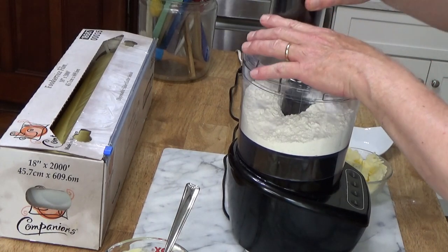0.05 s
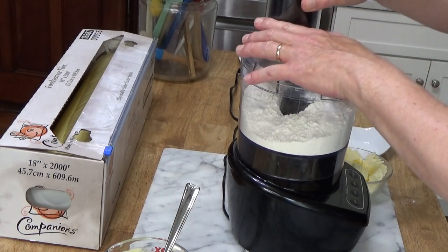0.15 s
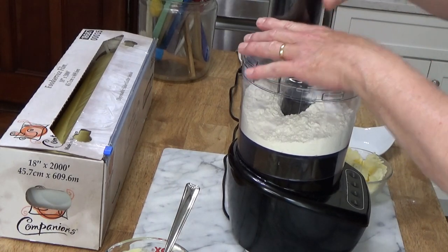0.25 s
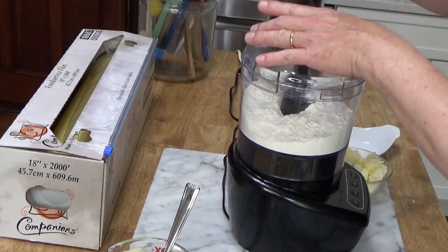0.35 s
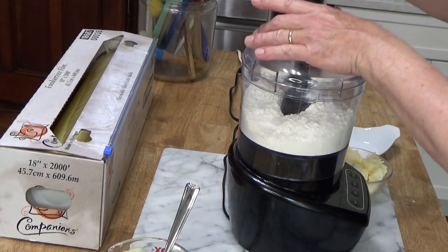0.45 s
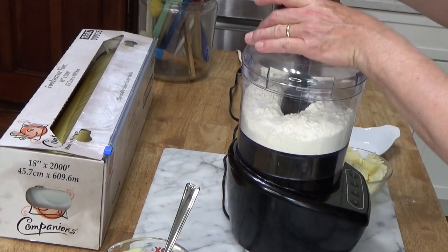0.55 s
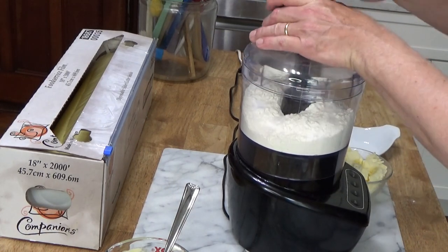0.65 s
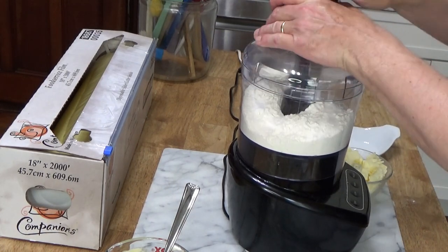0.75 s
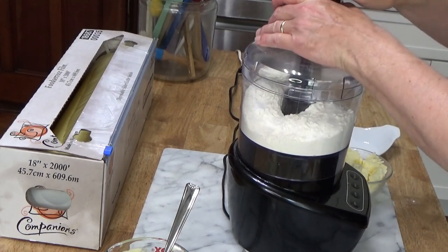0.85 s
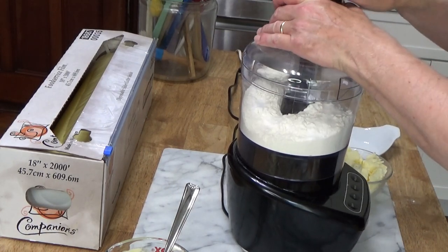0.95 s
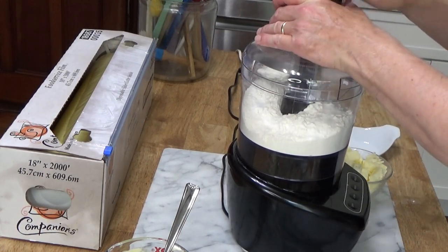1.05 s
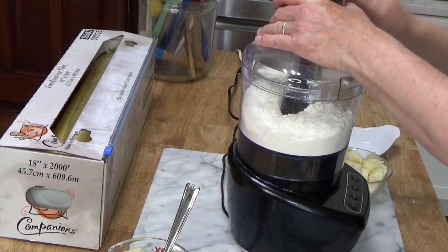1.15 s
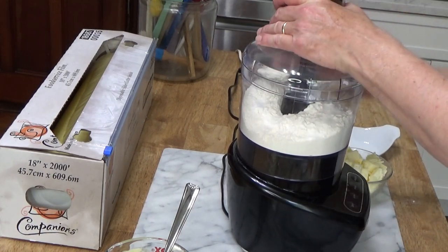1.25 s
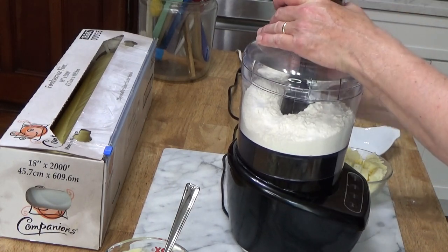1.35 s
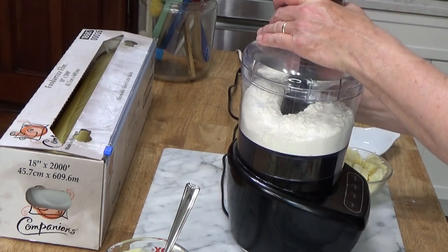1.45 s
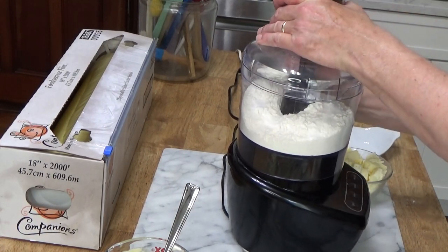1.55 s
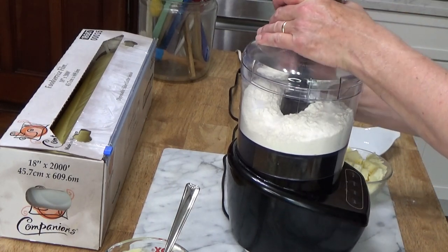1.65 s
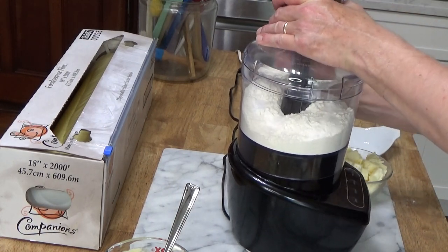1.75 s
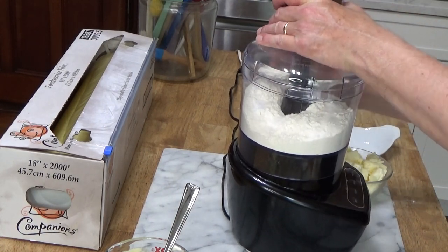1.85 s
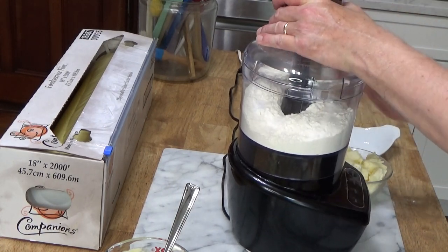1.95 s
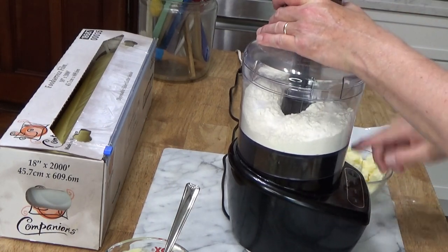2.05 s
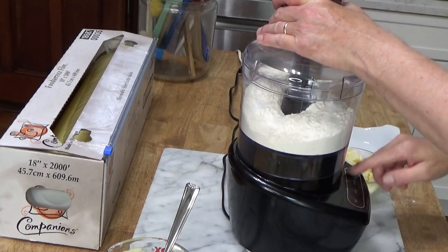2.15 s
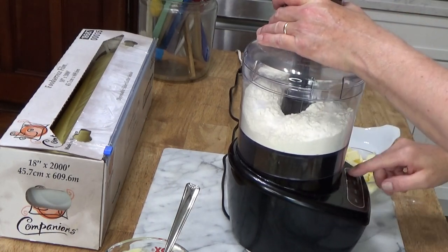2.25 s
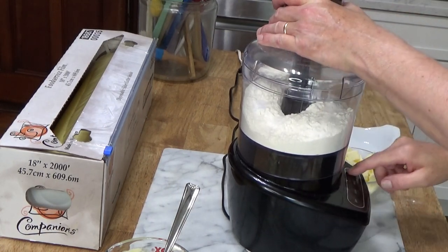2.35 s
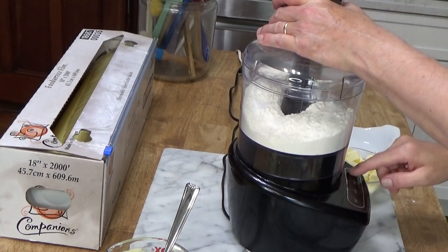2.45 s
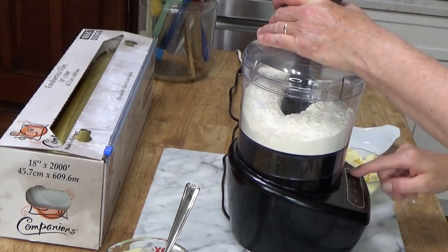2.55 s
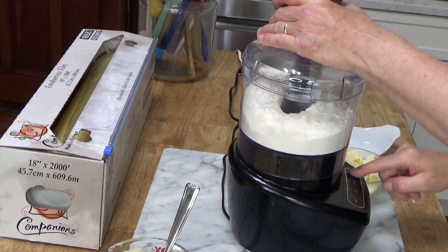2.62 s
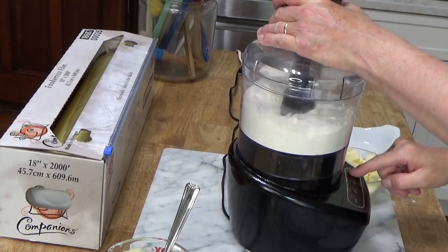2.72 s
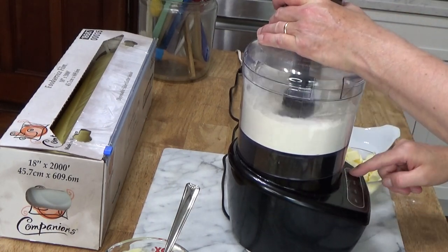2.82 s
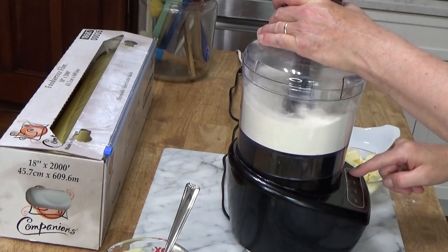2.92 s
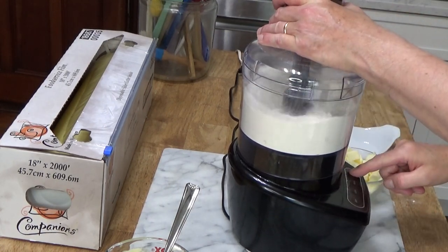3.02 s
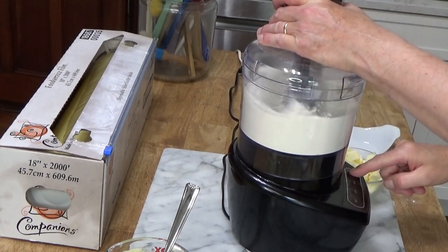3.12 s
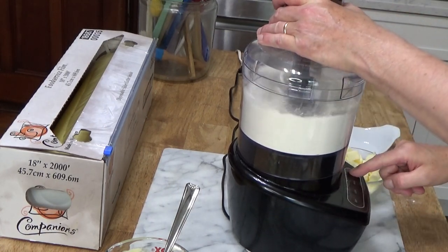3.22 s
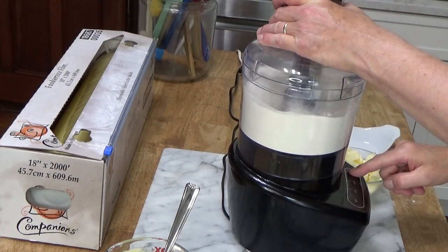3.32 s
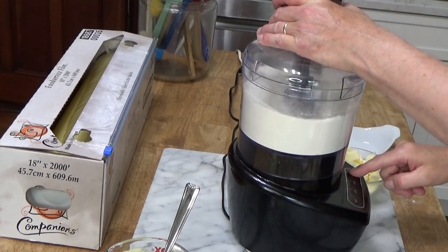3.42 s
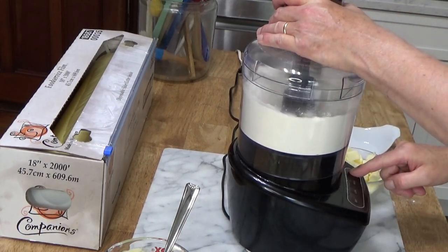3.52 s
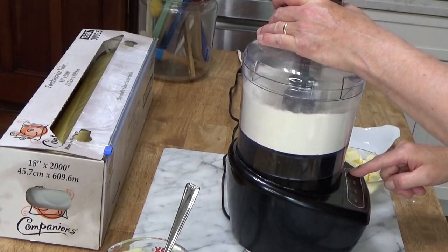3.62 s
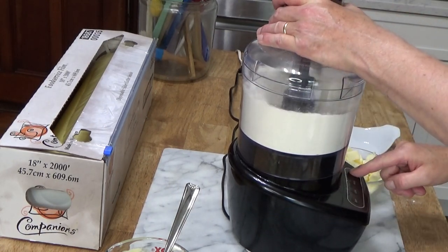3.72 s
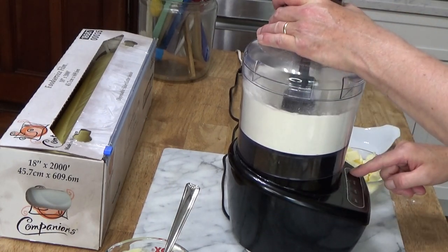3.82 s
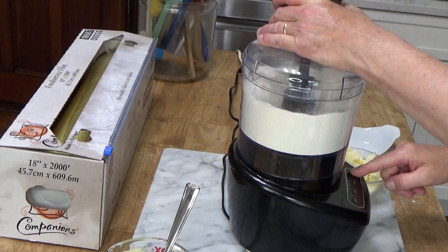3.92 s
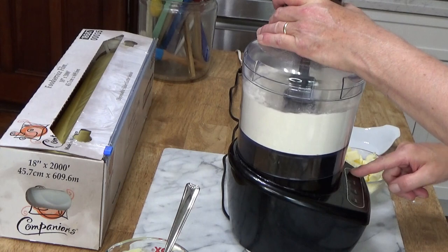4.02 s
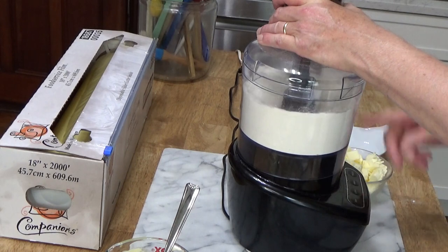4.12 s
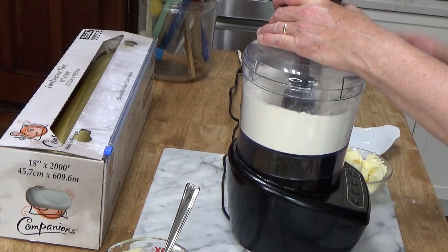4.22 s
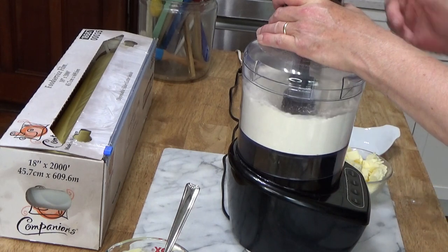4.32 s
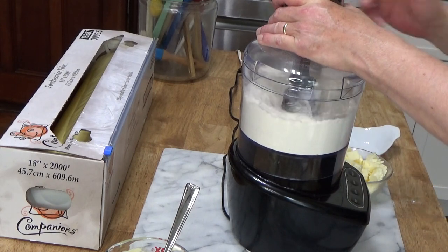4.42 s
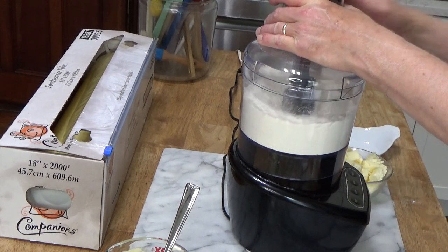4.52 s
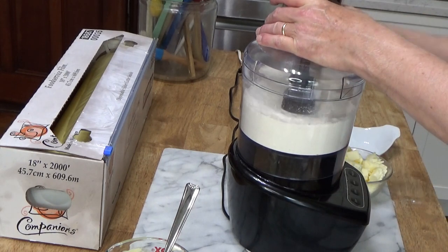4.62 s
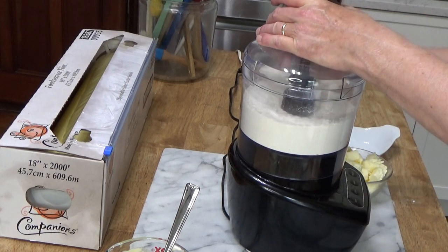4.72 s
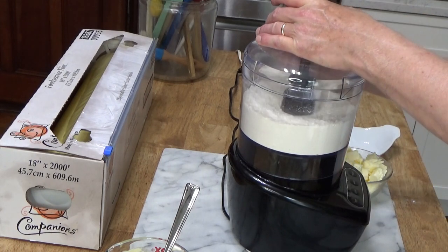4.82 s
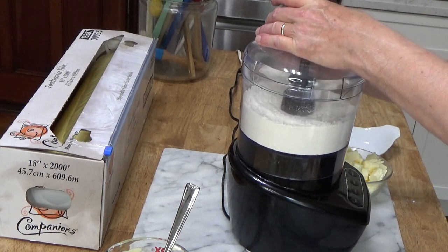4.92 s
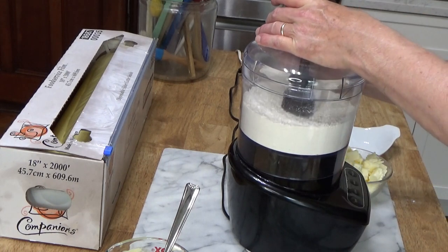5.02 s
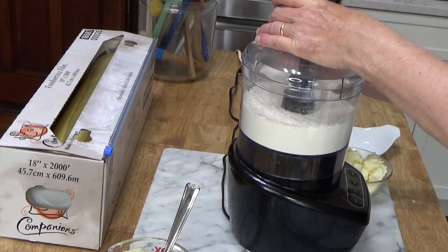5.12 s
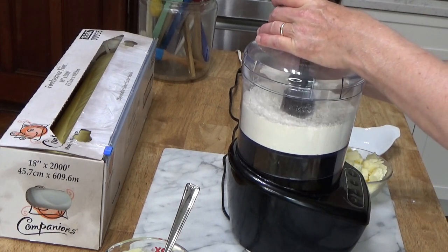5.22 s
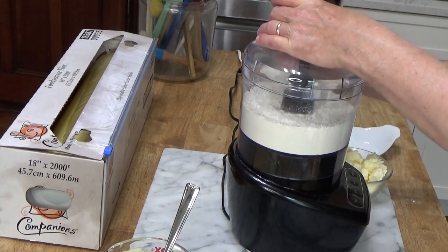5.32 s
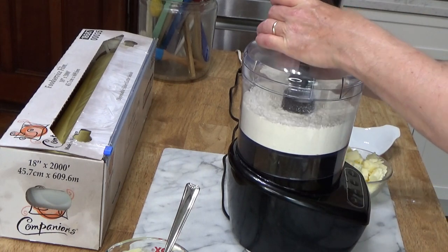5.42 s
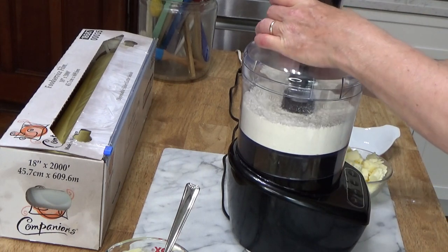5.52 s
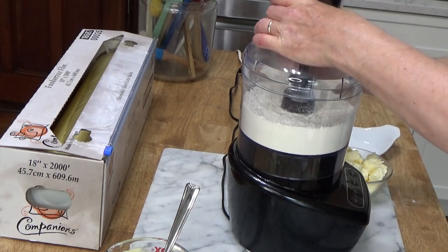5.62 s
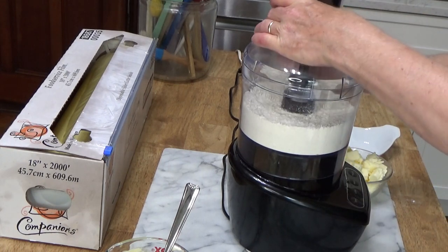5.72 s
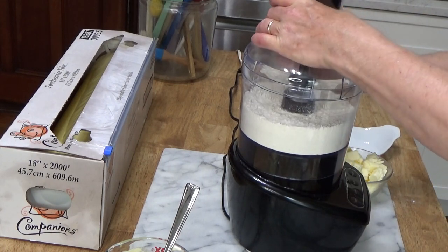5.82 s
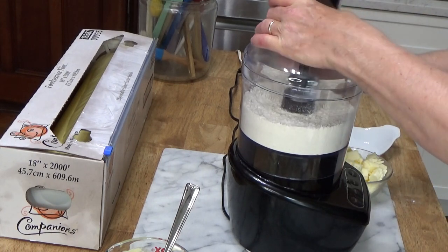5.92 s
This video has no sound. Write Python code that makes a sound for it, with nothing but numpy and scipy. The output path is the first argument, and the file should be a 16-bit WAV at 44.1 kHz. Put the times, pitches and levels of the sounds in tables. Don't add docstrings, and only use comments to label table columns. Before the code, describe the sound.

Plastic lid and feed-tube pusher clack and scrape in an echoing kitchen before a small geared motor runs briefly and coasts to a halt.

```python
import sys
import numpy as np
from scipy import signal
from scipy.fft import rfft, irfft, next_fast_len
from scipy.io import wavfile
from scipy.ndimage import uniform_filter1d

SR = 44100
rng = np.random.default_rng(int(sys.argv[2]) if len(sys.argv) > 2 else 0)


def gain_from_decibels(decibels):
    exponent = np.asarray(decibels, float) / 20
    return 10 ** exponent


def transcribe(u):
    v = np.clip(np.atleast_2d(u).T, -1, 1)
    q = np.round(v * 32767).astype(np.int16)
    wavfile.write(sys.argv[1], SR, q)


N = 263076

# pitch_hz, level_db (per Hz)
HUSH_COLOUR = [(47, -41), (80, -13), (288, -3.5), (714, -3), (931, 2.5), (1330, -5), (1450, -7),
               (1690, -4.5), (8120, -9.5), (15800, -16.5)]
HUSH_DB = -55.5 - 4.0
# pitch_hz, time_to_fall_60_db_s
KITCHEN_DECAY = [(120, .6), (300, .7), (700, .63), (1400, .61), (3700, .55), (9700, .43), (16000, .2)]
# pitch_hz, likeness (0 to 1)
ECHO_LIKENESS = [(100, 1), (300, 0.96), (700, 0.9), (1400, 0.34), (3000, 0.78), (12000, 0.62)]
# pitch_hz, level_db
FAR_KNOCK_COLOUR = [(120, -10), (280, 6), (900, 0), (3000, -4), (12000, -11)]
# pitch_hz, left_minus_right_db
LEFT_OVER_RIGHT = [(60, 1), (180, -3), (550, -2), (1650, -2), (4970, -2), (15000, -1)]

# pitch_hz, level_db (per Hz)
ROAR_COLOUR = [(40, -30), (151, -29), (219, -14), (344, -12), (464, -17), (728, -6), (1790, -5), (2190, -1),
               (2950, 2), (3610, 0.5), (4090, -7.5), (5120, -7.5), (9330, -16), (12000, -25), (15800, -37)]
# pitch_hz, width_hz, lift_db
HOUSING = [(745, 59, 7.5), (955, 50, 6.5), (1251, 12, 5), (1610, 157, 7.5), (2200, 290, 8.5),
           (6160, 150, 3.5), (8500, 98, -1), (10200, 530, 3.5)]
# pitch_hz, width_hz, lift_db
GEARBOX = (3600, 260, 7.5)
# pitch_hz, width_hz, lift_at_rest_db
SLOTS = [(6040, 83, -10.5), (8550, 100, 3), (9400, 470, 2)]
# pitch_hz, width_hz, lift_db, speed (turns per s), spread (turns per s)
DRUMMING = (2232, 380, -3.5, 244, 60)
# top_level_db, knee (turns per s), steepness (power), time_to_engage_s
ROAR_PARTS = [
    (-51, 300, 1.2, .05),
    (-21.5, 155, 1.19, 0.022),
    (-17, 187, 1.49, 0.013),
    (-16.5, 347, 1.61, 0.024),
]
# pitch_hz, level_db
HUM_BY_PITCH = [(65, -90), (95, -71), (130, -63), (175, -52), (200, -42), (225, -35), (245, -33.5),
                (360, -33.5)]
# multiple (of motor turns), driven_db, coasting_db (both against the air roar)
WHINE = [(24, -7, -7), (36, -26, -7), (48, -28, -3), (60, -30, -8), (72, -32, -7), (84, -32, -7),
         (96, -32, -9)]
# pitch_hz, level_db
VENTS = [(5500, -30), (6100, -3), (6500, -7), (7000, 0), (7450, -9), (7950, -3), (8300, -2), (8700, -13),
         (9500, -1), (10200, -30)]

# pitch_hz, level_db, time_to_fall_60_db_s
TUBE = [(636, -7, .35), (668, -3, .24), (703, -1, .24), (760, -8, .25), (1050, -5, .15), (1190, 0, .07),
        (2080, -6, .03), (2300, -11, .05)]
# pitch_hz, level_db (per Hz)
RUB_COLOUR = [(59, -51), (100, -11), (219, 1), (459, -22.5), (645, -5.5), (984, 3), (1050, 1.5),
              (4330, -13), (9090, -20.5), (15800, -35)]
# pitch_hz, level_db (per Hz)
TWIST_COLOUR = [(120, -51), (200, -15), (788, -6.5), (999, -10), (2110, -3.5), (6930, -9.5), (11300, -20),
                (14700, -39), (15800, -42)]
# start_s, end_s, start_db, end_db, release_s
SLIDES = [
    (0.398, 0.749, -50, -46, .01),
    (0.757, 1.07, -40, -48, 0.5),
    (1.395, 1.394, -37, -37, 0.074),
    (1.43, 1.637, -58, -34.5, .01),
]
# start_s, end_s, start_db, end_db, release_s
TUBE_SLIDES = [
    (.46, 0.74, -74, -48.5, 0.088),
    (0.98, 1.08, -56, -52, 0.18),
]
# start_s, end_s, start_db, end_db, release_s
TWIST = (5.807, 5.955, -45, -38.5, .05)

# start_s, level_db, pitch_hz
THUMPS = [
    (.459, -37, 676),
    (2.035, -50, 328),
    (2.06, -41, 330),
    (2.119, -36.5, 770),
    (2.157, -28, 770),
    (2.161, -39, 270),
    (2.179, -32, 750),
    (2.203, -35, 700),
    (5.828, -35.5, 785),
    (5.93, -28.5, 740),
]
# start_s, thud_db, thud_hz, crack_db, crack_hz
TICKS = [(1.3, -40.5, 910, -53, 2260), (1.392, -61, 1050, -27.5, 3180), (2.205, -37, 700, -39.5, 8900),
         (2.27, -58, 692, -43.5, 2970), (2.401, -73, 703, -52, 8800), (2.595, -46, 770, -46, 2690),
         (2.614, -33, 900, -36, 2410), (2.62, -35, 880, -22.5, 2410), (5.541, -34.5, 1200, -60, 2390),
         (5.691, -43, 1800, -46, 2600), (5.74, -51, 840, -39.5, 8500), (5.806, -33, 1410, -19, 4540),
         (5.95, -22.5, 1090, -31, 3790), (5.959, -24.5, 880, -27, 3670)]
CATCHES = [
    1.474,
    1.507,
    1.535,
    1.562,
    1.595,
]
# start_s, thud_db, crack_db, crack_hz
PUSHER_TAPS = [(.456, -26.5, -26, 2650), (.592, -56, -31.5, 2410), (.654, -40, -57, 3610),
               (.719, -32.5, -50, 2630), (.767, -40, -26, 4560), (.779, -29.5, -28, 4350),
               (.796, -44.5, -27.5, 4540), (.829, -46, -23, 4600), (.877, -46.5, -47, 2200),
               (.901, -47, -22.5, 3250), (.979, -56, -26, 4580), (1.004, -26, -29.5, 2400),
               (1.013, -53, -30, 3350), (1.028, -77, -23, 2380), (1.046, -33, -26, 4980),
               (1.074, -46, -28.5, 2260)]
# start_s, thud_db, thud_hz, crack_db
HARD_KNOCKS = [
    (.001, -13.5, 1200, -12),
    (.007, -9, 1710, -16),
    (.017, -6, 1187, 0),
    (.044, -10, 1280, -26),
    (.119, -15.5, 668, -3.5),
    (.268, -33, 730, -19),
    (1.619, -5.5, 804, 6.5),
    (1.622, -9, 1140, -33),
]

ON_S, OFF_S, STALL_S = 2.62, 3.965, 5.58


def rms_one(x):
    return x / np.sqrt(np.mean(x ** 2) + 1e-20)


def colour(x, points):
    size = next_fast_len(x.shape[-1])
    hz = np.maximum(np.fft.rfftfreq(size, 1 / SR), 1)
    at, db = np.transpose(points)
    gain = gain_from_decibels(np.interp(np.log(hz), np.log(at), db))
    return irfft(rfft(x, size) * gain, size)[..., :x.shape[-1]]


def band(x, low_hz, high_hz):
    return signal.sosfilt(signal.butter(2, [low_hz, high_hz], "band", fs=SR, output="sos"), x)


def resonance(x, hz, width_hz):
    r = np.exp(-np.pi * width_hz / SR)
    feedback = [1, -2 * r * np.cos(2 * np.pi * hz / SR), r * r]
    return signal.lfilter(np.array([1, 0, -1]) * (1 - r * r) / 2, feedback, x)


def ring(x, hz, t60):
    r = gain_from_decibels(-60 / (t60 * SR))
    w = 2 * np.pi * hz / SR
    return signal.lfilter([0, np.sin(w)], [1, -2 * r * np.cos(w), r * r], x + 1e-18)


def drift(rate_hz):
    r = np.exp(-2 * np.pi * rate_hz / SR)
    wander = signal.lfilter([1], [1, -2 * r, r * r], rng.standard_normal(N + SR))
    return rms_one(wander[SR:])


def grains(per_s, spread_db):
    sizes = gain_from_decibels(spread_db * np.minimum(rng.exponential(1, N), 5)) * rng.choice([-1, 1], N)
    return rms_one(sizes * (rng.random(N) < per_s / SR))


def room_hush():
    air = rng.standard_normal((3, N))
    return gain_from_decibels(HUSH_DB) * rms_one(colour(air[0] + 0.52 * air[1:], HUSH_COLOUR))


def kitchen_echo(x, onset_s=0.0025):
    t = np.arange(SR) / SR
    edges = 40 * 2 ** np.arange(0, 9.2, .5)
    decay_hz, decay_s = np.transpose(KITCHEN_DECAY)
    alike_hz, likeness = np.transpose(ECHO_LIKENESS)
    white = rng.standard_normal((2, 2, SR))
    echo = 0
    for k, (low, high) in enumerate(zip(edges, edges[1:])):
        log_hz = np.log(low * high) / 2
        t60 = np.interp(log_hz, np.log(decay_hz), decay_s)
        alike = np.clip(np.interp(log_hz, np.log(alike_hz), likeness), 0, 1)
        mid, side = band(white[k % 2], low, high) * gain_from_decibels(-60 * t / t60) / np.sqrt(t60)
        echo = echo + np.sqrt(1 + alike) * mid + np.sqrt(1 - alike) * side * [[1], [-1]]
    echo = echo * (1 - np.exp(-(t / onset_s) ** 2))
    echo = echo / np.sqrt(np.sum(echo ** 2) / 2)
    return signal.fftconvolve(x[None], echo, axes=1)[:, :N]


def motor_speed():
    run_turns, creep_per_s = 322, 27.5
    start_lag, spin_up_s = .76, .159
    drag_per_s, friction = .75, 85
    t = np.arange(N) / SR
    on = np.clip(t - ON_S, 0, OFF_S - ON_S)
    powered = (run_turns + creep_per_s * on) * (1 - start_lag * np.exp(-on / spin_up_s))
    floor = friction / drag_per_s
    speed = (powered + floor) * np.exp(-drag_per_s * np.maximum(t - OFF_S, 0)) - floor
    return uniform_filter1d(np.maximum(speed, 1), size=2600) * (t > ON_S) + 1e-9


def roar_gains(speed):
    stalling_s = 0.18
    t = np.arange(N) / SR
    moving = np.clip((STALL_S - t) / stalling_s, 0, 1)
    gains = []
    for top_db, knee, steepness, engage_s in ROAR_PARTS:
        by_speed = gain_from_decibels(top_db) * (speed / np.hypot(speed, knee)) ** steepness
        engaged = 1 - np.exp(-np.maximum(t - ON_S, 0) / engage_s)
        gains.append(by_speed * moving * engaged)
    return gains


def motor_roar(speed, turns, gains):
    chatter = colour(grains(15000, spread_db=1.5), ROAR_COLOUR)
    for hz, width_hz, lift_db in HOUSING:
        chatter = chatter + (gain_from_decibels(lift_db) - 1) * resonance(chatter, hz, width_hz)
    pace = speed / speed.max()
    hz, width_hz, lift_db = GEARBOX
    chatter = chatter + gain_from_decibels(lift_db) * pace ** 4 * resonance(chatter, hz, width_hz)
    for hz, width_hz, lift_db in SLOTS:
        chatter = chatter + gain_from_decibels(lift_db) * (1 - pace) * resonance(chatter, hz, width_hz)
    hz, width_hz, lift_db, critical, spread = DRUMMING
    drumming = np.exp(-((speed - critical) / spread) ** 2)
    chatter = chatter + gain_from_decibels(lift_db) * drumming * resonance(chatter, hz, width_hz)
    chatter = chatter * gain_from_decibels(1.1 * np.sin(.17 * turns) + .7 * drift(25))
    low = colour(chatter, [(1500, 0), (2100, -40)])
    rumble = colour(chatter, [(130, 0), (180, -40)])
    high = colour(chatter, [(3700, -40), (4700, 0)])
    parts = (rumble, low - rumble, chatter - low - high, high)
    return sum(gain * rms_one(part) for gain, part in zip(gains, parts))


def motor_hum(speed, turns):
    build_s = .16
    t = np.arange(N) / SR
    hum_db = np.interp(speed, *np.transpose(HUM_BY_PITCH), -120) + 2.2 * drift(15)
    hum_db = hum_db - 40 * np.clip(1 - (t - ON_S) / build_s, 0, 1)
    hum = np.sqrt(2) * gain_from_decibels(hum_db) * np.sin(turns)
    return hum + gain_from_decibels(1.5) * resonance(gain_from_decibels(hum_db) * np.sin(2 * turns), 700, 120)


def motor_whine(speed, turns, air_gain):
    no_load_turns, full_whine_slip = 365, .17
    coasting = np.arange(N) / SR > OFF_S
    load_db = 20 * np.log10(np.minimum((1 - speed / no_load_turns) / full_whine_slip, 1))
    whine = 0
    for k, driven_db, coasting_db in WHINE:
        vent_db = np.interp(k * speed, *np.transpose(VENTS), -80, -80)
        level_db = np.where(coasting, coasting_db, driven_db + load_db)
        whine = whine + gain_from_decibels(level_db + vent_db + 2.5 * drift(8)) * np.sin(k * turns)
    return whine * air_gain


def motor():
    speed = motor_speed()
    turns = 2 * np.pi * np.cumsum(speed * (1 + .002 * drift(40))) / SR
    gains = roar_gains(speed)
    tones = motor_hum(speed, turns) + motor_whine(speed, turns, gains[-1])
    return motor_roar(speed, turns, gains), tones


def stroke(start_s, end_s, start_db, end_db, release_s):
    t = np.arange(N) / SR
    times = [start_s, end_s, end_s + release_s]
    return gain_from_decibels(np.interp(t, times, [start_db, end_db, end_db - 40], -120, -120))


def rubbing():
    slips = grains(4000, spread_db=2.5) * gain_from_decibels(2.5 * drift(30))
    hollow = sum(gain_from_decibels(db) * ring(slips, hz, t60) for hz, db, t60 in TUBE)
    slide = band(rms_one(colour(slips, RUB_COLOUR)) + 0.46 * rms_one(hollow), 170, 15000)
    twist = rms_one(colour(grains(5000, spread_db=2.0) * gain_from_decibels(2.2 * drift(56)), TWIST_COLOUR))
    tube_hum = rms_one(band(hollow, 630, 1500))
    rub = gain_from_decibels(-2.0) * sum(stroke(*row) for row in SLIDES) * slide
    rub = rub + stroke(*TWIST) * twist
    return rub + sum(stroke(*row) for row in TUBE_SLIDES) * tube_hum


def contacts(events, tube_db, rattle_s, thud_width_hz, edge):
    length, rise_s = 3000, .001
    t = np.arange(length) / SR
    out = np.zeros((2, N + length))
    pushes, pitch = np.zeros(N), np.ones(N)
    for s, thud_db, thud_hz, crack_db, crack_hz in events:
        i = round(s * SR)
        rattle = rng.standard_normal(length) * np.exp(-(t / rattle_s) ** 2) * np.minimum(t / rise_s, 1)
        jolt = np.array([rattle, np.zeros(length)])
        jolt[:, 0] = edge, np.sqrt(np.sum(rattle ** 2))
        thud = band(resonance(jolt, thud_hz, thud_width_hz), thud_hz / 3, thud_hz * 2)
        crack = resonance(jolt, crack_hz, 2100) + 0.65 * band(jolt, 1100, 6100)
        out[:, i:i + length] += gain_from_decibels(thud_db) * thud / np.abs(thud[0]).max()
        out[:, i:i + length] -= gain_from_decibels(crack_db) * crack / np.abs(crack[0]).max()
        pushes[i], pitch[i] = gain_from_decibels(thud_db + tube_db), thud_hz
    for hz, db, t60 in TUBE:
        nearness = 1 / (1 + (np.log(pitch / hz) / 0.047) ** 2)
        out[:, :N] += gain_from_decibels(db) * ring(pushes * nearness, hz, t60)
    return signal.sosfilt(signal.butter(2, 170, "high", fs=SR, output="sos"), out[:, :N])


def palm_thumps():
    events = [(s, db, hz, -99, hz) for s, db, hz in THUMPS]
    return contacts(events, tube_db=-14, rattle_s=0.0093, thud_width_hz=210, edge=.3)


def light_taps():
    catches = [(s, -39 + 3 * k, 1120, -36 + 2.5 * k, 3200) for k, s in enumerate(CATCHES)]
    events = catches + list(TICKS)
    return contacts(events, tube_db=-11, rattle_s=0.0048, thud_width_hz=290, edge=0.55)


def pusher_taps():
    thud_hz = 690
    events = [(s, thud_db, thud_hz, crack_db, crack_hz) for s, thud_db, crack_db, crack_hz in PUSHER_TAPS]
    return contacts(events, tube_db=-12, rattle_s=0.0037, thud_width_hz=450, edge=0.43)


def hard_knocks():
    crack_hz = 2500
    events = [(*row, crack_hz) for row in HARD_KNOCKS]
    return contacts(events, tube_db=-5.0, rattle_s=0.0036, thud_width_hz=620, edge=1.18)


def scene():
    roar, tones = motor()
    rub = rubbing()
    soft, soft_far = palm_thumps()
    light, light_far = light_taps()
    pusher, pusher_far = pusher_taps()
    hard, hard_far = hard_knocks()
    to_room = gain_from_decibels(6.5) * colour(hard_far, FAR_KNOCK_COLOUR) + gain_from_decibels(-1.5) * soft_far
    to_room = to_room + gain_from_decibels(-2.5) * (light_far + pusher_far + rub)
    to_room = to_room + gain_from_decibels(-6.0) * roar + tones / 3
    close = hard + soft + pusher + light + rub + gain_from_decibels(-2) * roar + tones
    left, right = close + kitchen_echo(to_room)
    left = colour(left, np.array(LEFT_OVER_RIGHT) * [1, .5])
    right = colour(right, np.array(LEFT_OVER_RIGHT) * [1, -.5])
    return np.array([left, right]) + room_hush()


def band_limit(x):
    return signal.sosfilt(signal.butter(12, 15920, fs=SR, output="sos"), x)


def record(dry):
    ramp_db = 260 * np.arange(N) / SR
    level_db = 20 * np.log10(np.abs(dry).max(axis=0) + 1e-9)
    held_db = np.maximum.accumulate(level_db + ramp_db) - ramp_db
    cut_db = .85 * np.maximum(held_db + 4.5, 0)
    r = np.exp(-1 / (.0003 * SR))
    cut_db = np.roll(signal.lfilter([1 - r], [1, -r], cut_db), -44)
    top_cut = signal.cheby2(12, 60, 16300, fs=SR, output="sos")
    mix = signal.sosfilt(top_cut, dry * gain_from_decibels(-cut_db))
    return band_limit(mix)


dry = scene()
out = record(dry)
transcribe(out)
```